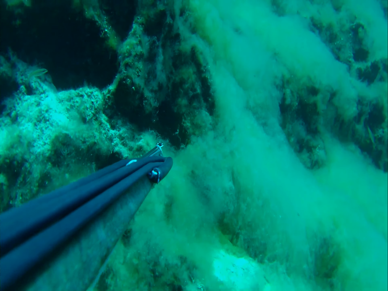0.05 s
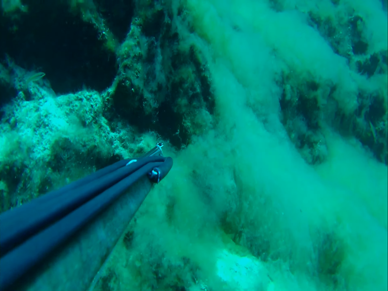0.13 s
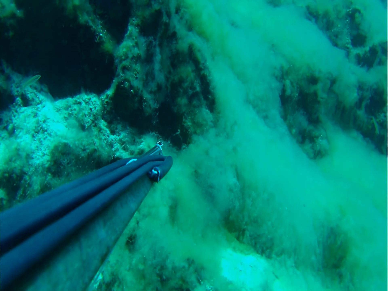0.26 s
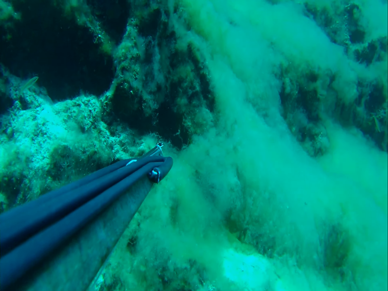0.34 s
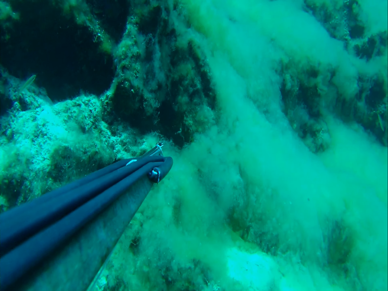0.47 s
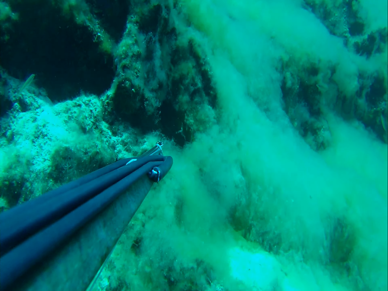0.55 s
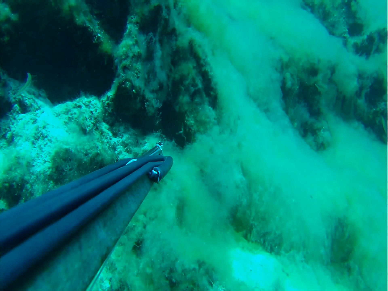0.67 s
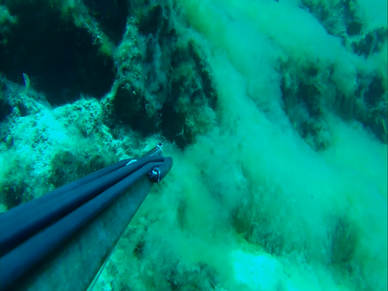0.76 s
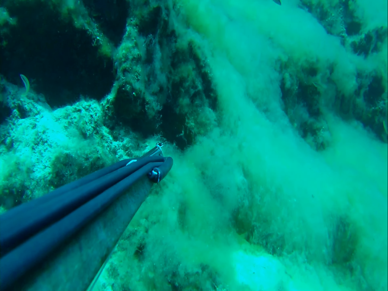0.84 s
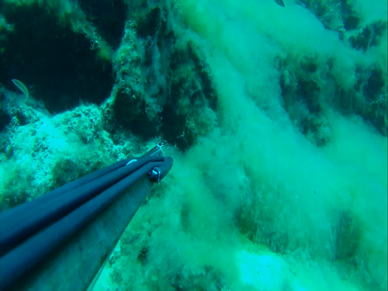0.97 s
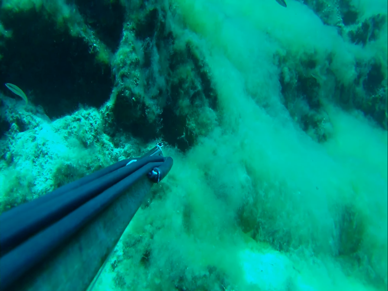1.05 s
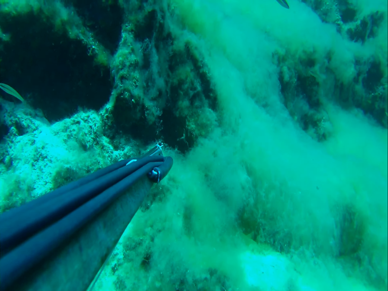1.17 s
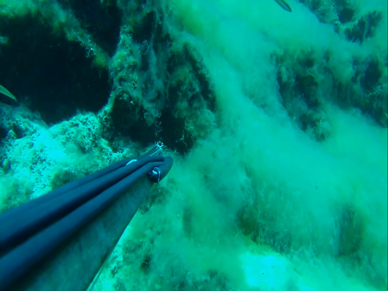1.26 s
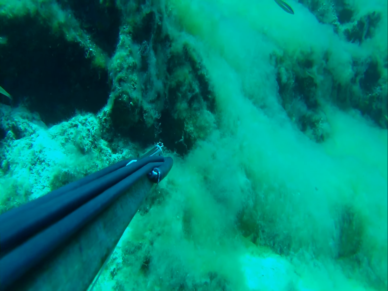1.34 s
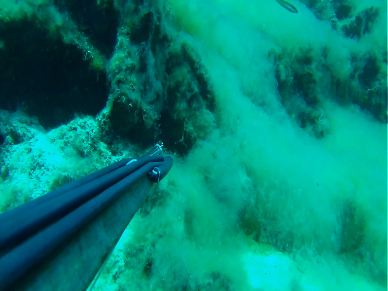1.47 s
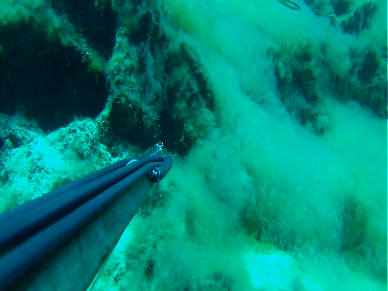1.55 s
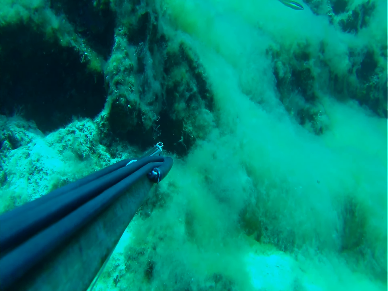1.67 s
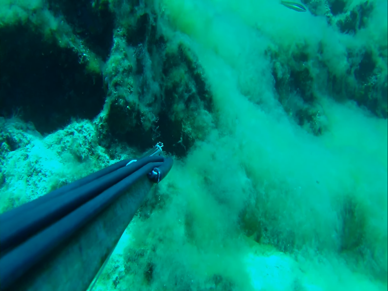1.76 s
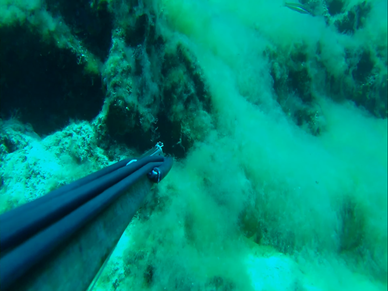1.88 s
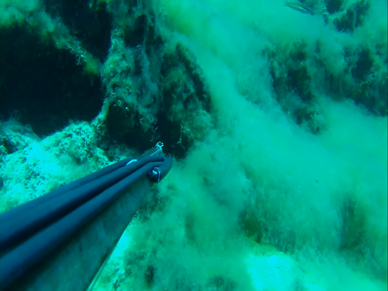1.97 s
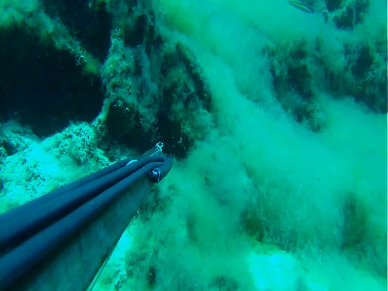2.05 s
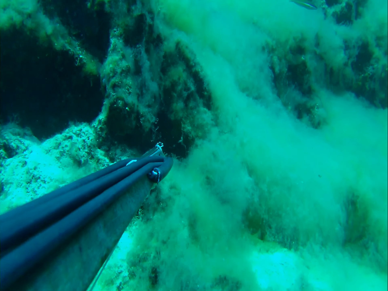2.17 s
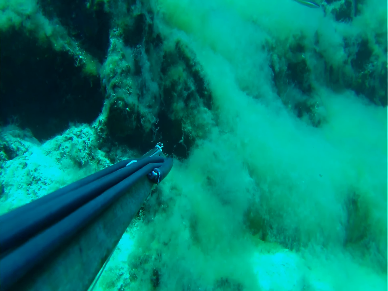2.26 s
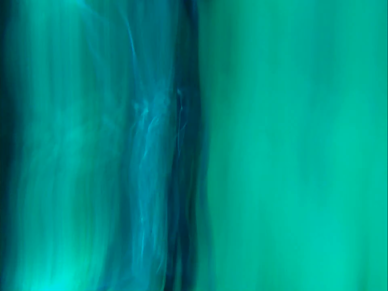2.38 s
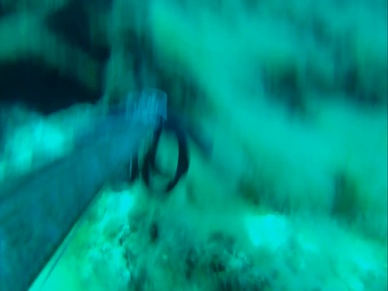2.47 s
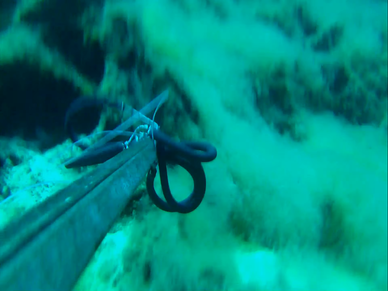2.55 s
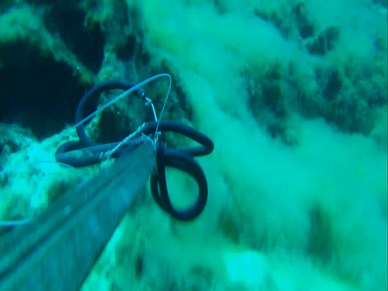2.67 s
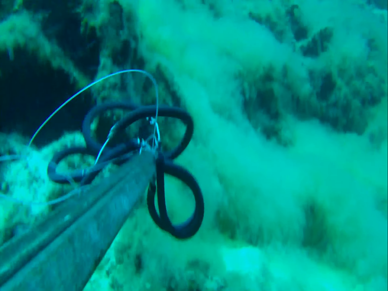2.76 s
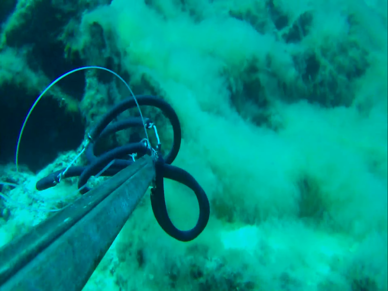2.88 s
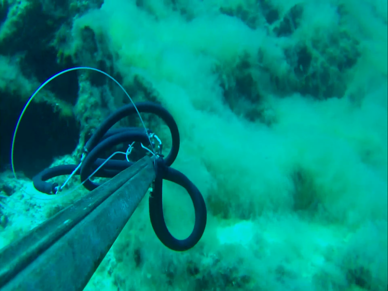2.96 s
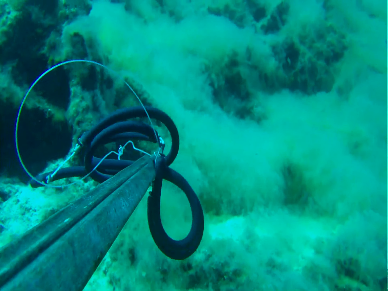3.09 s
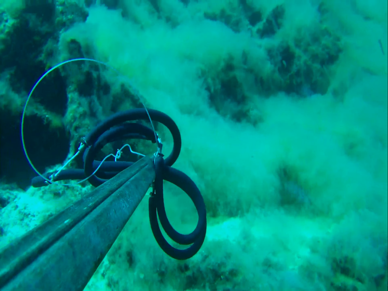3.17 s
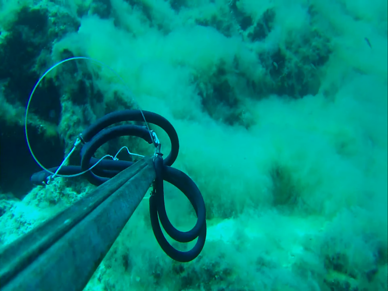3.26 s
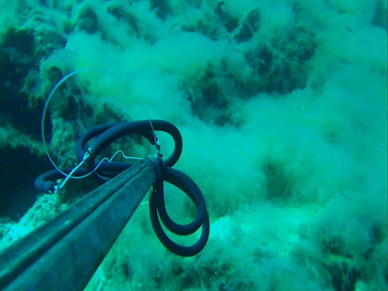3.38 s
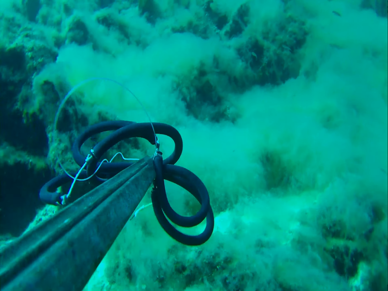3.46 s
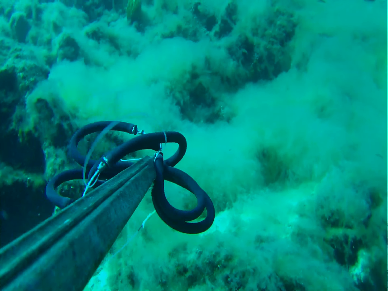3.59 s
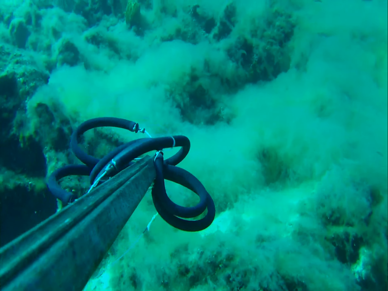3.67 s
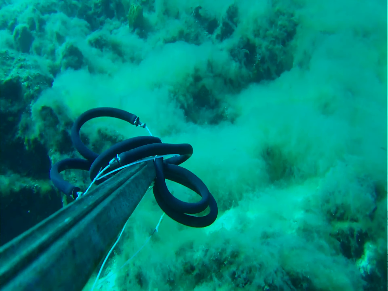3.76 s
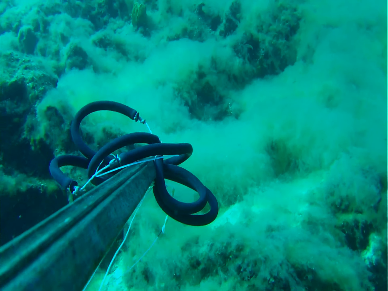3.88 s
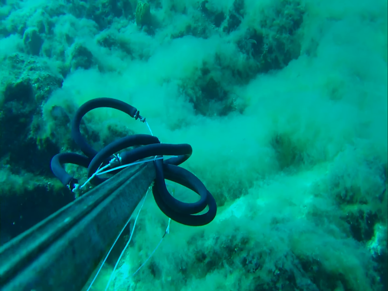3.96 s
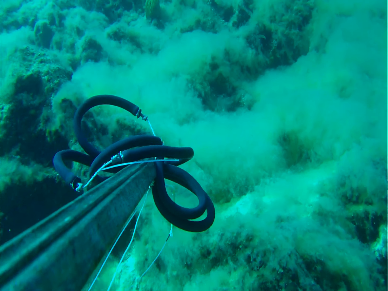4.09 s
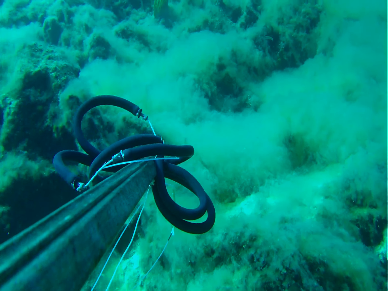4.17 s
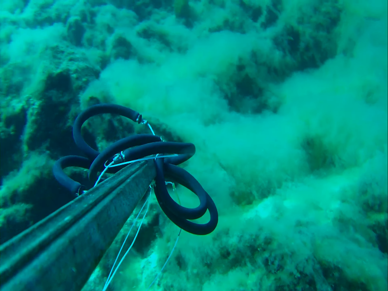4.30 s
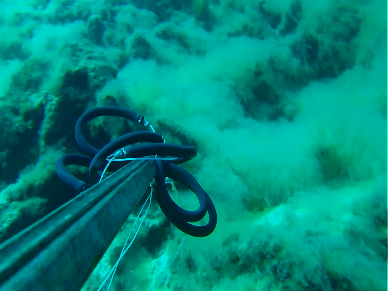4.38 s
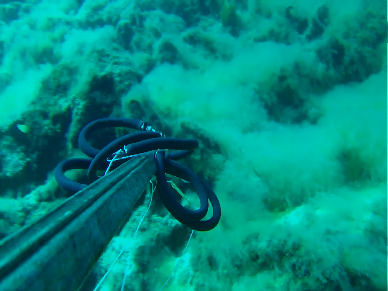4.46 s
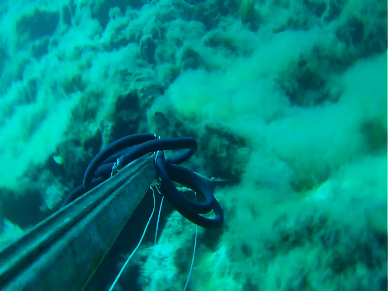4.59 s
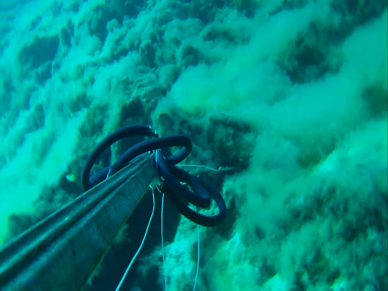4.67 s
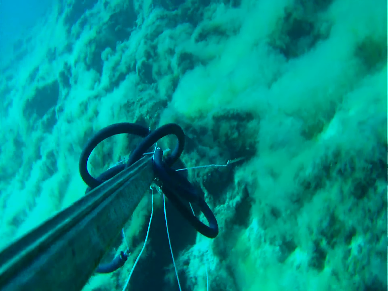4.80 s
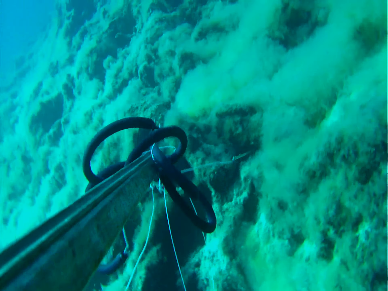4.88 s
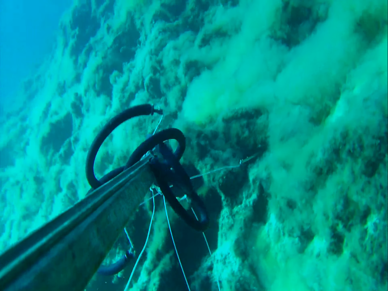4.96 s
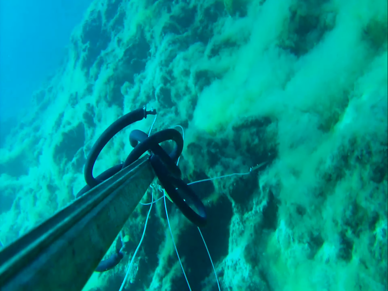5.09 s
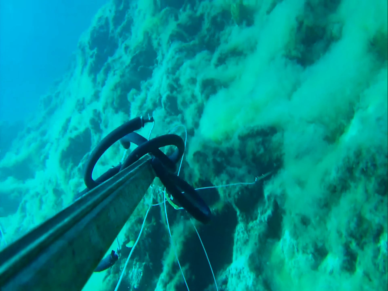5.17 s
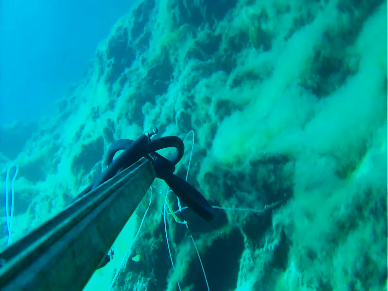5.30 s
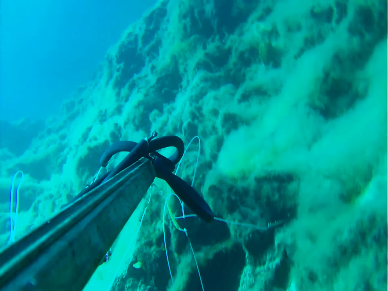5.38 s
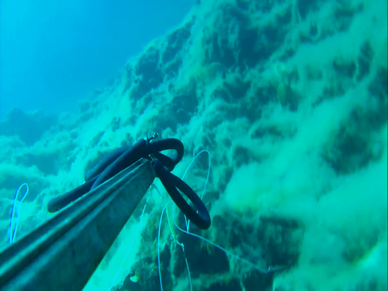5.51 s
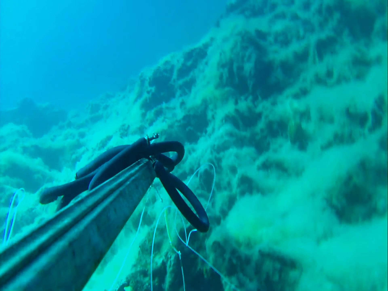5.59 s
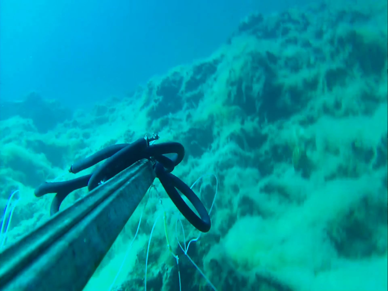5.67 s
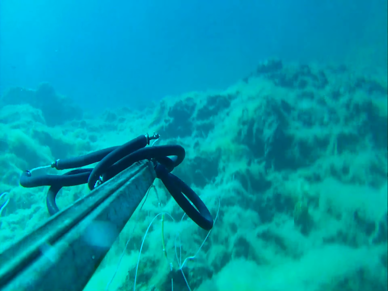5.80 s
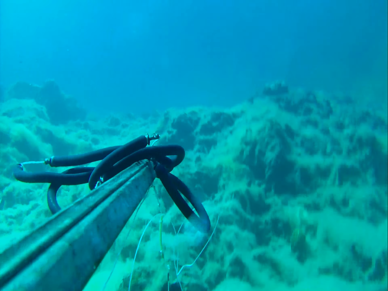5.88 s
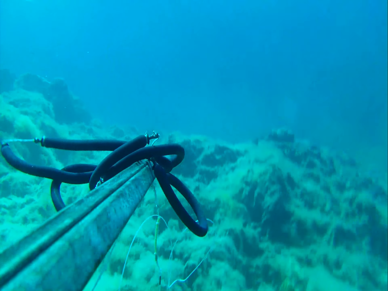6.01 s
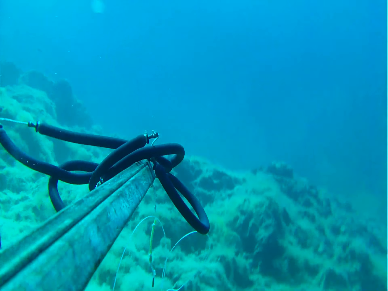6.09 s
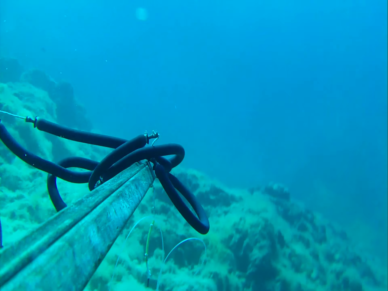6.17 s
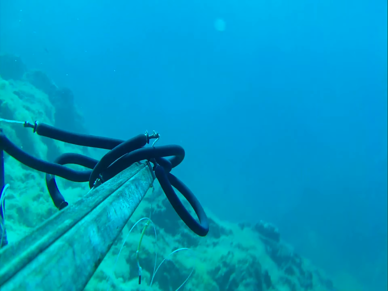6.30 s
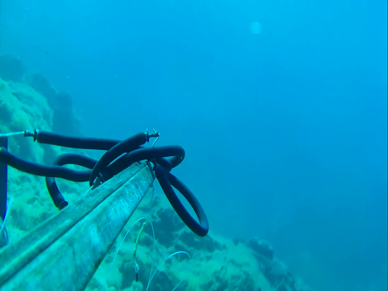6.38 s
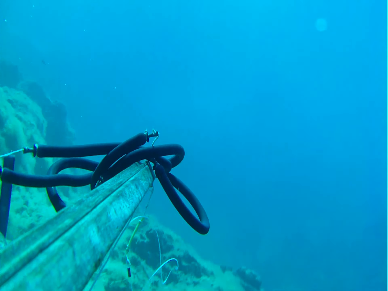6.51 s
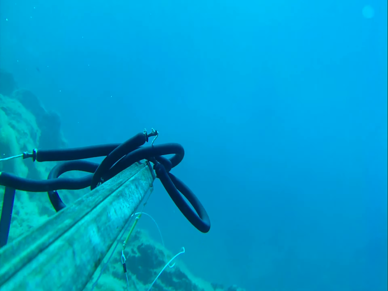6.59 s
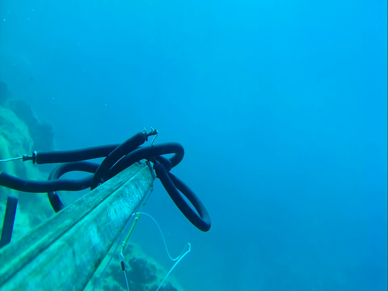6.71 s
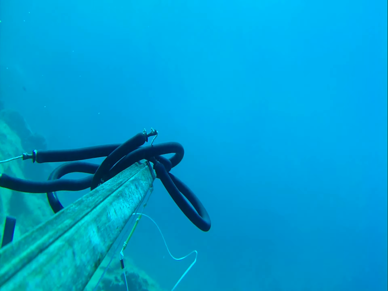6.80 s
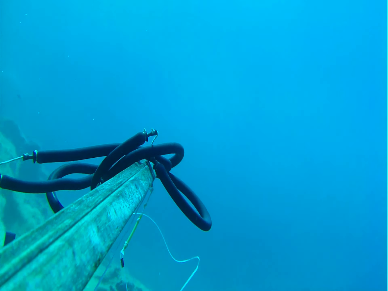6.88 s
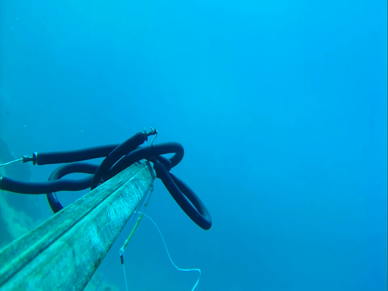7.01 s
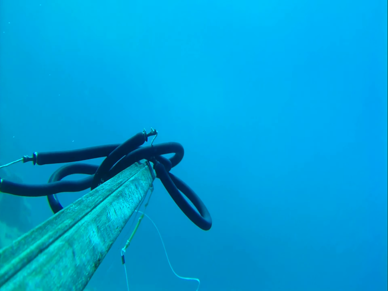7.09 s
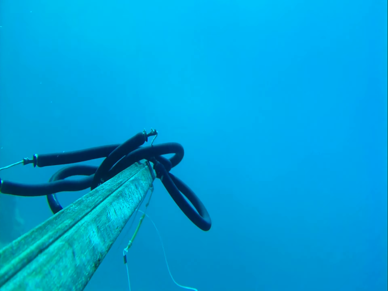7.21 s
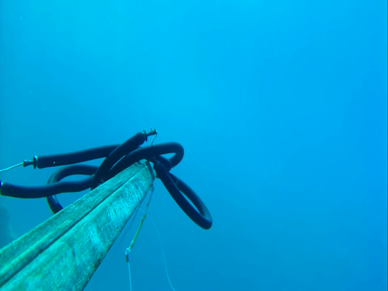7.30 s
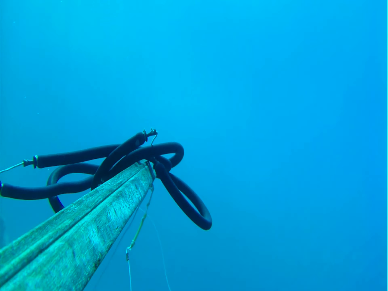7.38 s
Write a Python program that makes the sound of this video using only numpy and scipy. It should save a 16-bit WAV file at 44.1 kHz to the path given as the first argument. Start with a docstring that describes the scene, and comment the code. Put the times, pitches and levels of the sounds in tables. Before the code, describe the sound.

A speargun fires underwater with a hard metallic snap and slapping rattle, after quiet clunks; tackle knocks, rubber groans and scrapes trail into a soft wash.

```python
"""A speargun is fired under water, heard through a camera housing over an even hiss.
While aiming, grit ticks and scrapes (random grains ring housing modes) and a loose part clunks in pairs.
The shaft snaps free and rasps, bands slap, metal clinks (struck modes), and water churns (noise, bubbles).
Loose tackle then knocks on the barrel; as the gun swings round, rubber creaks, groans and squeaks by
stick-slip. Scrapes and gulping air pockets recur, and a soft wash of filtered noise closes the scene."""
import sys
import numpy as np
from scipy import signal
from scipy.fft import rfft, irfft, next_fast_len
from scipy.io import wavfile

SR = 44100
rng = np.random.default_rng(int(sys.argv[2]) if len(sys.argv) > 2 else 0)


def master_out(mix):
    """Clip the mix to full scale and print it as 16-bit PCM to the path in sys.argv[1]."""
    frames = np.transpose(np.atleast_2d(mix))
    ceiling = np.clip(frames, -1, 1)
    pcm = np.round(ceiling * 32767).astype(np.int16)
    wavfile.write(sys.argv[1], SR, pcm)


N = 328534
TIME = np.arange(N) / SR  # s
AGE = TIME[:SR // 8]  # s since a single event began

# Spectrum of the steady hiss. Each row: frequency in Hz, level in dB.
HISS_SPECTRUM = [(25, -23.5), (140, -9.5), (480, 2.5), (900, 1), (2500, -6), (6500, -7.5), (15500, -13.5)]
HISS_DB = -65  # rms
WHINE_HZ, WHINE_DB = 7880, -83  # rms
FLICKER_HZ, FLICKER_DB = 6030, -84  # rms

# Single grains of grit catching. Each row: start in seconds, level in dB before a common gain.
TICKS = [(0.2265, -45.5), (1.3058, -43.5), (1.3358, -42), (1.367, -50), (6.167, -41.5), (6.776, -41),
         (6.8003, -38.5)]
# Gritty scrapes on the housing. Each row: start in seconds, length in seconds, level in dB,
# gain of the high modes in dB.
SCRAPES = [(0.345, 0.067, -54, -3), (1.288, 0.071, -56, -0.5), (1.355, 0.036, -56, 5),
           (3.62, 0.1, -57, -0.5), (4.78, 0.1, -42, 0), (4.876, 0.14, -44, -2), (4.946, 0.031, -37, -25),
           (4.975, 0.17, -58.5, -6), (5.167, 0.027, -56, -1), (5.9, 0.24, -60, -3.5),
           (6.162, 0.076, -53.5, -4.5), (6.247, 0.26, -58.5, -2.5), (6.424, 0.074, -48, -8),
           (6.694, 0.12, -50.5, -5), (6.764, 0.08, -48, -5.5)]
# Lower and upper housing modes. Each row: frequency in Hz, bandwidth in Hz, level in dB.
HOUSING_LOW_MODES = [(1150, 210, 7), (1960, 370, 1), (2590, 290, 5)]
HOUSING_HIGH_MODES = [(5720, 1100, 0), (7070, 1540, -0.5), (8900, 660, -4.5), (10460, 2400, -13.5)]

# Dull double clunks while aiming. Each row: start in seconds, peak in dB.
CLUNKS = [(0.321, -33), (0.752, -44.5), (0.855, -32.5), (1.222, -30.5), (1.422, -30.5), (2.157, -31.5),
          (2.491, -33.5)]
# Modes of the loose part. Each row: frequency in Hz, bandwidth in Hz, level in dB.
CLUNK_MODES = [(275, 82, -1.5), (402, 43, 4), (587, 84, 2), (826, 51, 4), (1090, 250, -10), (1660, 60, -13),
               (2300, 170, -18.5)]

# Shaft and line sliding over the gun. Each row: start in seconds, length in seconds, level in dB.
SLIDES = [(2.557, 0.087, -37.5), (2.625, 0.0064, -23), (2.66, 0.16, -48), (2.757, 0.0069, -41.5)]
SLIDE_RISE_S, SLIDE_FALL_S = 0.0031, 0.0084
# Blows as the shaft leaves and the bands slap the muzzle.
# Each row: start in seconds, level in dB, ring frequency in Hz.
BLOWS = [(2.578, -8.5, 1220), (2.585, -13.5, 1570), (2.602, -15, 1110), (2.614, -11.5, 550),
         (2.6274, -7, 920), (2.633, -12, 1430), (2.649, -15.5, 775), (2.680, -13, 600), (2.686, -16.5, 493),
         (2.694, -13.5, 780), (2.705, -17, 1100), (2.7262, -14, 900), (2.732, -15, 546),
         (2.7952, -20.5, 1310), (2.7984, -11, 980), (2.8042, -16.5, 1160), (2.808, -18, 483),
         (2.8141, -22.5, 1600), (2.820, -31, 1250), (2.875, -22.5, 980), (2.899, -26, 480)]
# Modes of the whole gun. Each row: frequency in Hz, bandwidth in Hz, level in dB.
GUN_MODES = [(157, 9, -20), (244, 30, -7.5), (327, 25, -4.5), (485.5, 16, 7.5), (660, 120, 2),
             (1090, 70, 2), (1440, 29, 5.5), (1610, 45, 3.5), (2400, 500, -6.5)]
# Metal clinks of shaft and wishbones. Each row: start in seconds, peak in dB, ring frequency in Hz.
CLINKS = [(2.579, -10, 2870), (2.5806, -5.5, 4550), (2.602, -16.5, 5150), (2.6288, -17, 5440),
          (2.654, -21.5, 5130), (2.6753, -29, 5100), (2.6816, -16.5, 5100), (2.6868, -20, 5100),
          (2.6958, -22.5, 4900), (2.7242, -15, 2600), (2.734, -19, 5000), (2.7979, -16, 3920),
          (2.815, -28, 2630), (2.9072, -33.5, 2700)]
# Spectrum of the crack in clinks and chatter. Each row: frequency in Hz, level in dB.
CRACK_SPECTRUM = [(500, -17.5), (2600, 0.5), (5200, -2.5), (10000, -12), (15500, -29)]

# Spectrum of stirred eddies. Each row: frequency in Hz, level in dB.
WAKE_SPECTRUM = [(55, -26), (120, -8), (220, 1.5), (520, -4.5), (1100, -13), (3000, -20)]
# Water churned by a blow; its level is relative to that blow.
STIR_S, STIR_DB, STIR_RISE_S, STIR_FALL_S = 0.0097, -21, 0.0035, 0.025
# The gun moving through water, in recoil and then swung round.
# Each row: start in seconds, length in seconds, level in dB.
SWEEPS = [(2.76, 0.095, -52.5), (4.38, 0.62, -51.5)]
SWEEP_RISE_S, SWEEP_FALL_S = 0.12, 0.48
BUBBLES_FROM_S, BUBBLES_UNTIL_S = 2.57, 6.95
# Decay constants in cycles; the frequency of a bubble grows by twice CHIRP_PER_S per second.
BUBBLE_CYCLES, GULP_CYCLES, CHIRP_PER_S = 9.3, 2.1, 0.74
# Large air pockets breaking up. Each row: start in seconds, first frequency in Hz, level in dB.
GULPS = [(3.336, 131, -51), (3.737, 232, -38.5), (5.162, 234, -35.5), (5.209, 262, -40), (5.323, 254, -35),
         (5.456, 230, -48), (6.574, 139, -45.5)]
# Soft wash of water. Each row: time in seconds, level in dB.
WASH = [(7.05, -81.5), (7.25, -63), (7.45, -68.5)]
# Spectrum of the wash. Each row: frequency in Hz, level in dB.
WASH_SPECTRUM = [(200, -16), (480, 9), (1100, 5), (3000, -34.5)]

# Tackle knocking on the barrel. Each row: start in seconds, level in dB, treble against body in dB.
KNOCKS = [(2.992, -31.5, 7), (3.125, -33, 4), (3.258, -37.5, 2), (3.557, -34, 2), (3.721, -34, 3.5),
          (3.759, -27.5, 5), (3.925, -27.5, 12), (4.057, -36, 6), (4.229, -24, 10), (5.128, -34.5, 4),
          (5.393, -37, 1.5), (5.525, -31.5, 5.5), (5.627, -34.5, 3), (5.76, -32, 4), (5.959, -39, 10),
          (6.126, -24, 20.5), (6.431, -32.5, 3.5), (6.66, -39.5, 12)]
# Modes excited by a knock. Each row: frequency in Hz, bandwidth in Hz, level in dB.
KNOCK_MODES = [(235, 73, -1), (339, 60, 2.5), (524, 47, 2), (830, 121, -3.5), (1213, 126, -9.5),
               (1575, 95, -12), (2520, 410, -17.5), (6040, 2300, -30)]

# Rubber sticking and slipping on the barrel. Each row: time in seconds, mean rate in slips per second.
SLIP_RATE = [(4.294, 80), (4.33, 220), (4.368, 340), (4.395, 125), (4.418, 110), (4.445, 215), (4.49, 330),
             (4.77, 108), (4.96, 150)]
SLIP_S, SLIP_ROUGH = .003, .55  # decay of a skid; its share against the clean slip
# Modes of the sharp slips. Each row: frequency in Hz, bandwidth in Hz, level in dB.
SLIP_MODES = [(245, 46, 13.5), (565, 145, 13), (1100, 330, 8), (2590, 180, 2), (3760, 700, -11)]
# The stretch where each slip is sharp.
CREAK_FROM_S, CREAK_LENGTH_S, CREAK_DB, CREAK_EDGE_S = 4.294, 0.242, -44, 0.012
# Tugs that make the bands judder. Each row: start in seconds, length in seconds, level in dB.
TUGS = [(4.358, 0.038, -40), (4.475, 0.013, -33), (4.772, 0.014, -34.5), (4.837, 0.04, -34),
        (4.948, 0.013, -32.5), (5.085, 0.039, -44.5)]
TUG_RISE_S, TUG_FALL_S = 0.01, 0.017
# Modes of judder and drag. Each row: frequency in Hz, bandwidth in Hz, level in dB.
TUG_MODES = [(232, 100, 4), (508, 48, 9.5), (656, 87, 6), (915, 75, 5), (1196, 300, -7.5)]
DRAG_FROM_S, DRAG_LENGTH_S, DRAG_DB = 4.31, 0.81, -50  # the bands drag steadily over the gun

# Short rubber squeaks. Each row: start in seconds, length in seconds, first frequency in Hz,
# last frequency in Hz, level in dB.
SQUEAKS = [(4.495, 0.02, 2020, 2600, -50), (4.546, 0.046, 1020, 980, -44.5),
           (4.687, 0.028, 2540, 2310, -54.5), (4.838, 0.03, 473.6, 484, -29.5),
           (4.938, 0.034, 292.6, 380, -34), (4.963, 0.047, 344, 352, -37.5),
           (5.024, 0.018, 1310, 1420, -43), (5.06, 0.014, 1436, 1240, -44.5),
           (5.139, 0.012, 530, 586, -38.5)]
# The long groan of the rubber. Each row: time in seconds, mean frequency in Hz, level in dB.
GROAN = [(4.68, 1040, -43.5), (4.709, 819, -49.5), (4.714, 668, -34.5), (4.737, 603, -35),
         (4.75, 462, -24.5), (4.761, 505, -34), (4.77, 494, -33.5), (4.797, 482, -29), (4.808, 480, -56)]

CUTOFF_HZ = 15900


def from_db(db):
    """Level to amplitude: 20 dB is a factor of ten."""
    return 10 ** (np.asarray(db) / 20)


def rms_one(x):
    """Normalisation to unit mean power."""
    return x / np.sqrt(np.mean(x ** 2) + 1e-20)


def peak_one(x):
    """Normalisation to unit peak."""
    return x / (np.abs(x).max() + 1e-20)


def blow_one(x):
    """Normalisation to the energy of a unit level lasting 1.4 ms."""
    return x / np.sqrt(np.sum(x ** 2) / (.0014 * SR))


def add(out, s, sound):
    """Superposition: a sound is summed in at a given time."""
    at = max(round(s * SR), 0)
    out[at:at + len(sound)] += sound[:N - at]


def swell(rows):
    """Amplitude envelope: level interpolated from the last column, silent outside the rows."""
    rows = np.array(rows)
    inside = np.interp(TIME, rows[:, 0], np.ones(len(rows)), 0, 0)
    return inside * from_db(np.interp(TIME, rows[:, 0], rows[:, -1]))


def stroke(s, length, db, rise_s, fall_s):
    """Exponential relaxation: one movement builds up to its start, holds, then dies away."""
    before = np.maximum(s - TIME, 0)
    after = np.maximum(TIME - s - length, 0)
    return from_db(db) * np.exp(-np.minimum(before / rise_s + after / fall_s, 20))


def strokes(rows, rise_s, fall_s):
    """Incoherent addition: the powers of several movements sum."""
    return np.sqrt(sum(stroke(s, length, db, rise_s, fall_s) ** 2 for s, length, db in rows))


def butter(x, hz, kind, order=2):
    """Causal filtering with a maximally flat passband, low- or high-pass."""
    return signal.sosfilt(signal.butter(order, min(hz, SR / 2 - 1), kind, fs=SR, output="sos"), x)


def colour(x, spectrum):
    """Minimum-phase filtering: a folded cepstrum makes the causal filter of a given spectrum."""
    size = 2 * next_fast_len(len(x))
    hz = np.maximum(np.arange(size // 2 + 1) * SR / size, 1)
    points, db = np.transpose(spectrum)
    skirts = np.minimum(hz / points[0], 1) * np.minimum(points[-1] / hz, 1)  # falls away at both ends
    gain = from_db(np.interp(np.log(hz), np.log(points), db)) * skirts ** 2
    cepstrum = irfft(np.log(gain))
    response = np.exp(rfft(2 * cepstrum[:size // 2], size))
    return irfft(rfft(x, size) * response, size)[:len(x)]


def resonate(x, modes):
    """Modal superposition: parallel damped resonances of alternating sign."""
    out = 0
    for k, (hz, width, db) in enumerate(modes):
        r = np.exp(-np.pi * width / SR)  # pole radius from bandwidth
        poles = [1, -2 * r * np.cos(2 * np.pi * hz / SR), r * r]
        mode = signal.lfilter([1, 0, -1], poles, x + 1e-18)
        out = out + (-1) ** k * from_db(db) * (1 - r * r) / 2 * mode
    return out


def flutter(hz):
    """Low-passed noise: random wavering up to a given rate, of unit rms."""
    return rms_one(butter(rng.standard_normal(N), hz, "low"))


def background():
    """Stationary noise and tones: even hiss, a whine until the shot, and a faint flickering tone."""
    hiss = from_db(HISS_DB) * rms_one(colour(rng.standard_normal(N), HISS_SPECTRUM))
    whine = from_db(WHINE_DB) * rms_one(np.sin(2 * np.pi * WHINE_HZ * TIME)) * (TIME < BUBBLES_FROM_S)
    flicker = resonate(rng.standard_normal(N), [(FLICKER_HZ, 60, 0)]) * from_db(3 * flutter(5))
    return hiss + whine + from_db(FLICKER_DB) * rms_one(flicker)


def contact(decay_s, scatter):
    """Impulsive excitation: a click followed by a dying scatter of reflections."""
    push = scatter * rng.standard_normal(len(AGE)) * np.exp(-AGE / decay_s) * np.sqrt(2 / (decay_s * SR))
    push[0] += 1
    return push


def grains(per_s, spread_db):
    """Shot noise: random clicks of uneven size and either sign."""
    sizes = from_db(spread_db * np.minimum(rng.exponential(1, N), 4))
    return (rng.random(N) < per_s / SR) * sizes * rng.choice([-1, 1], N)


def scrapes(tick_s=0.0022, tick_db=4.0):
    """Granular friction: dense and sparse grains ring the housing; single ones catch and tick."""
    out = np.zeros(N)
    grit = rms_one(grains(per_s=2800, spread_db=-7.0))
    crackle = rms_one(grains(per_s=120, spread_db=4))
    grit = (grit + crackle) * from_db(3 * flutter(45))
    low = butter(resonate(grit, HOUSING_LOW_MODES), 950, "high", order=3)
    high = resonate(grit, HOUSING_HIGH_MODES)
    for s, length, db, treble_db in SCRAPES:
        part = slice(round(s * SR), round((s + length) * SR))
        scrape = rms_one(low[part] + from_db(treble_db) * high[part])
        arch = np.abs(np.sin(np.linspace(0, np.pi, len(scrape)))) ** .8
        add(out, s, from_db(db) * scrape * arch)
    for s, db in TICKS:
        ring = resonate(contact(tick_s, scatter=0.33), HOUSING_LOW_MODES + HOUSING_HIGH_MODES)
        add(out, s, from_db(db + tick_db) * peak_one(ring))
    return out


def clunks(gap_s=.0026, first_db=-5, scatter=1.0, seat_s=0.0055, low_hz=215):
    """Double impact: a loose part touches lightly, then seats a few milliseconds later."""
    out = np.zeros(N)
    for s, db in CLUNKS:
        seat = np.roll(contact(seat_s, scatter), round(gap_s * SR))
        push = seat + from_db(first_db) * contact(.002, scatter)
        ring = butter(resonate(push, CLUNK_MODES), low_hz, "high", order=3)
        add(out, s + .001, from_db(db) * peak_one(ring))
    return out


def bump(decay_s, rise_s):
    """Compliant contact: the noisy push builds up before it dies."""
    return rng.standard_normal(len(AGE)) * (1 - np.exp(-AGE / rise_s)) * np.exp(-AGE / decay_s)


def shot(thud_s=.002, scatter=1.0, damping=0.35, body_db=-6, thud_top_hz=2500,
         clink_s=0.00082, clink_width_hz=800, crack_db=-1):
    """Impact and friction: slaps thud and shake the gun, metal clinks, the shaft rasps and chatters."""
    out = np.zeros(N)
    for s, db, hz in BLOWS:
        push = contact(thud_s, scatter)
        ring = butter(resonate(push, [(hz, hz * damping, 0)]), 1.6 * hz, "low", order=3)
        body = butter(resonate(contact(thud_s, scatter), GUN_MODES), thud_top_hz, "low", order=3)
        add(out, s, from_db(db) * blow_one(blow_one(ring) + from_db(body_db) * blow_one(body)))
    for s, db, hz in CLINKS:
        ring = resonate(contact(clink_s, scatter), [(hz, clink_width_hz, 0)])
        crack = colour(bump(clink_s, clink_s), CRACK_SPECTRUM)
        add(out, s, from_db(db) * peak_one(peak_one(ring) + from_db(crack_db) * peak_one(crack)))
    rasp = resonate(grains(per_s=5500, spread_db=1.0), HOUSING_LOW_MODES + HOUSING_HIGH_MODES)
    chatter = colour(grains(per_s=1200, spread_db=3), CRACK_SPECTRUM)
    sliding = rms_one(rms_one(rasp) + rms_one(chatter))
    return out + strokes(SLIDES, SLIDE_RISE_S, SLIDE_FALL_S) * sliding


def bubble(hz, ring_cycles):
    """Volume pulsation: an air pocket rings for a few cycles, rising slightly in pitch."""
    cycles = hz * AGE * (1 + CHIRP_PER_S * AGE)
    envelope = np.exp(-cycles / ring_cycles) * (1 - np.exp(-cycles)) * (1 - AGE / AGE[-1])
    return np.sin(2 * np.pi * cycles) * envelope


def bubbles(count=170):
    """Independent random events: small bubbles spread evenly in time and over three octaves."""
    out = np.zeros(N)
    for when, size, strength in rng.random((count, 3)):
        s = BUBBLES_FROM_S + when * (BUBBLES_UNTIL_S - BUBBLES_FROM_S)
        add(out, s, from_db(-14 * strength) * bubble(170 * 8 ** size, BUBBLE_CYCLES))
    return out


def gulp(hz, count=6, spread_s=0.019, shards_db=-4):
    """Break-up of a cavity: a large pocket rings briefly and sheds smaller, higher bubbles."""
    out = bubble(hz, GULP_CYCLES)
    for delay, size in rng.random((count, 2)):
        shard = from_db(shards_db) * 2 ** -size * bubble(hz * 5 ** size, GULP_CYCLES)  # higher is weaker
        out = out + np.pad(shard, (round(delay * spread_s * SR), 0))[:len(AGE)]
    return out


def water(ring_share=0.25, bubble_share=0.83, sweep_low_hz=110, lumpy_db=3):
    """Turbulence and cavity resonance: motion stirs eddies and bubbles, pockets gulp, water washes."""
    eddies = butter(colour(grains(per_s=1000, spread_db=5), WAKE_SPECTRUM), 2000, "low", order=4)
    churn = rms_one(rms_one(eddies) + ring_share * rms_one(resonate(eddies, GUN_MODES)))
    churn = rms_one(churn + bubble_share * rms_one(bubbles()))
    swirl = rms_one(butter(churn, sweep_low_hz, "high") * from_db(lumpy_db * flutter(7.1)))
    stirs = [(s, STIR_S, db + STIR_DB) for s, db, *_ in BLOWS]
    out = strokes(stirs, STIR_RISE_S, STIR_FALL_S) * churn
    out = out + strokes(SWEEPS, SWEEP_RISE_S, SWEEP_FALL_S) * swirl * (TIME > BUBBLES_FROM_S)
    for s, hz, db in GULPS:
        add(out, s, from_db(db) * gulp(hz))
    return out + swell(WASH) * rms_one(colour(rng.standard_normal(N), WASH_SPECTRUM))


def knocks(decay_s=0.0062, rise_s=0.0023, treble_hz=1100, top_hz=2800):
    """Cushioned impact: wishbones and bands bump the barrel, each with its own balance of modes."""
    out = np.zeros(N)
    for s, db, treble_db in KNOCKS:
        low_cut_hz = 230 * from_db(treble_db / 4)  # brighter knocks are thinner
        ring = butter(resonate(bump(decay_s, rise_s), KNOCK_MODES), low_cut_hz, "high", order=3)
        treble = butter(butter(ring, treble_hz, "high", order=1), top_hz, "low")
        ring = ring + (from_db(treble_db) - 1) * treble
        add(out, s, from_db(db) * blow_one(ring))
    return out


def along_barrel(x, travel_s=.0022):
    """Dispersion of bending waves: high frequencies arrive first, so a slip becomes a falling chirp."""
    size = next_fast_len(N + SR)
    hz = np.arange(size // 2 + 1) * SR / size
    delay = np.exp(-4j * np.pi * travel_s * np.sqrt(1000 * hz))  # travel_s is the delay at 1 kHz
    return irfft(rfft(x, size) * delay, size)[:N]


def creak():
    """Stick-slip friction: stretched rubber slips sharply, judders dully at each tug, and rubs softly."""
    s, per_s = np.transpose(SLIP_RATE)
    rate = np.interp(TIME, s, per_s) * np.exp(.07 * flutter(150))
    turns = np.ceil(np.cumsum(rate * (TIME > s[0])) / SR)
    sizes = np.sqrt(SR / rate) * from_db(2 * rng.standard_normal(N))  # mean power stays even with rate
    starts = np.diff(turns, prepend=0) * sizes
    decays = signal.lfilter([1], [1, -np.exp(-1 / (SLIP_S * SR))], starts + 1e-18)
    skids = decays * rng.standard_normal(N)  # each slip skids briefly
    slips = rms_one(along_barrel(starts)) + SLIP_ROUGH * rms_one(skids)
    ticks = butter(resonate(slips, SLIP_MODES), 130, "high", order=4)
    judder, drag = (butter(butter(resonate(x, TUG_MODES), 110, "high", order=4), 2500, "low")
                    for x in (slips, rng.standard_normal(N)))
    slipping = (TIME > s[0]) & (TIME < s[-1])
    sharp = stroke(CREAK_FROM_S, CREAK_LENGTH_S, CREAK_DB, CREAK_EDGE_S, CREAK_EDGE_S)
    tugging = strokes(TUGS, TUG_RISE_S, TUG_FALL_S)
    dragging = stroke(DRAG_FROM_S, DRAG_LENGTH_S, DRAG_DB, TUG_RISE_S, TUG_FALL_S)
    return (sharp * ticks / np.std(ticks[slipping])
            + tugging * judder / np.std(judder[slipping])
            + dragging * rms_one(drag))


def rubber_tone(hz, overtone_db=-18, waver=0.0244, rough_db=2.6):
    """Periodic stick-slip: a fundamental and octave of unsteady pitch and strength, of unit power."""
    wobble, shake = rms_one(butter(rng.standard_normal((2, len(hz))), 110, "low", order=4))
    phase = 2 * np.pi * np.cumsum(hz * (1 + waver * wobble)) / SR
    tone = np.sin(phase) + from_db(overtone_db) * np.sin(2 * phase)
    return rms_one(from_db(rough_db * shake) * tone)


def squeaks():
    """Frequency locking: where the slips lock the rubber sings, in one long groan and gliding squeaks."""
    s, hz, _ = np.transpose(GROAN)
    out = swell(GROAN) * rubber_tone(np.interp(TIME, s, hz))
    for s, length, first_hz, last_hz, db in SQUEAKS:
        along = np.linspace(0, 1, round(length * SR))
        tone = rubber_tone(first_hz * (last_hz / first_hz) ** along)
        add(out, s, from_db(db) * tone * np.sqrt(np.abs(np.sin(np.pi * along))))
    return out


def scene():
    """Linear superposition: all sources sum into one channel."""
    hiss_scrapes_clunks = background() + scrapes() + clunks()
    shot_water_rubber = shot() + water() + knocks() + creak() + squeaks()
    return (hiss_scrapes_clunks + shot_water_rubber)[None]


def record(dry):
    """Saturation and band limiting: the highest peaks are rounded and the top is cut steeply."""
    low_pass = signal.ellip(12, .1, 80, CUTOFF_HZ, fs=SR, output="sos")
    return signal.sosfilt(low_pass, np.tanh(dry))


dry = scene()
out = record(dry)
master_out(out)
```